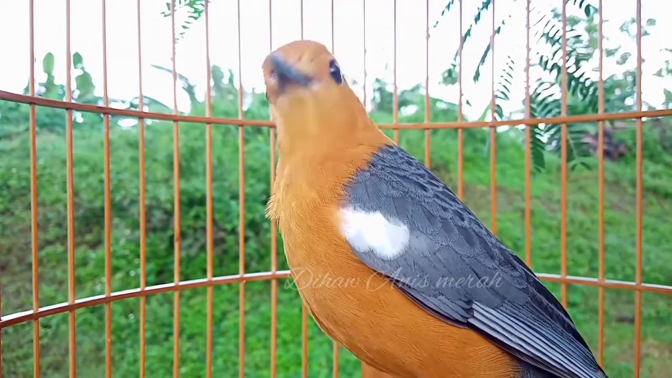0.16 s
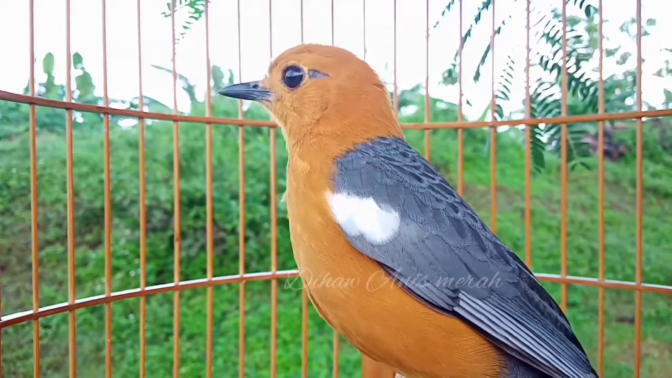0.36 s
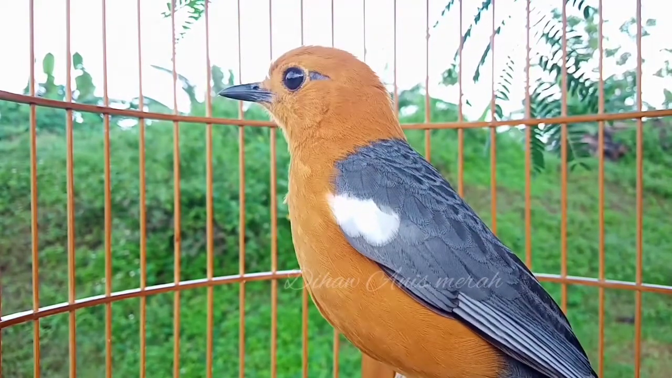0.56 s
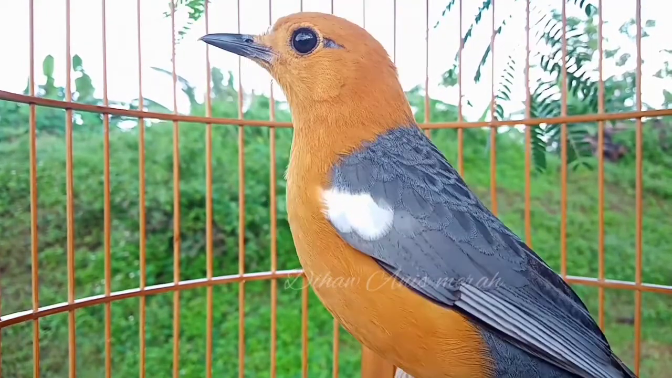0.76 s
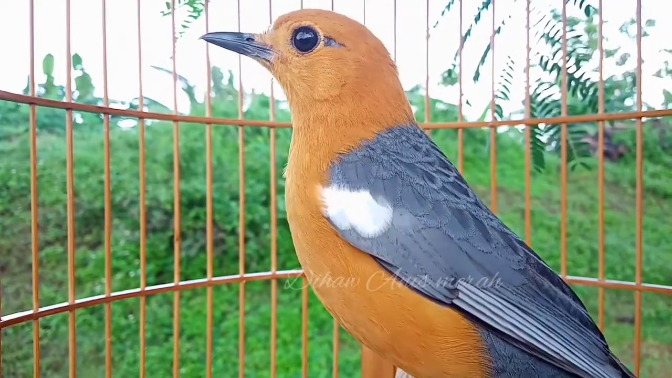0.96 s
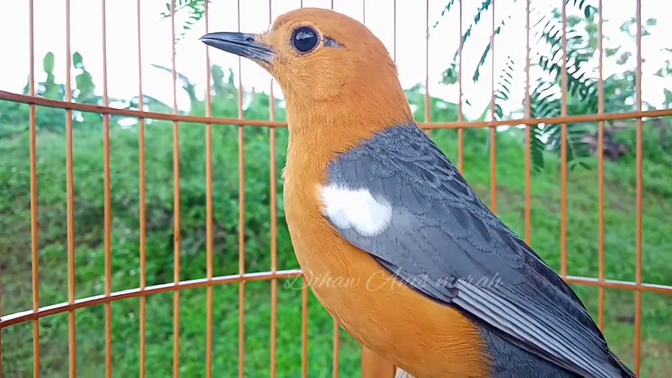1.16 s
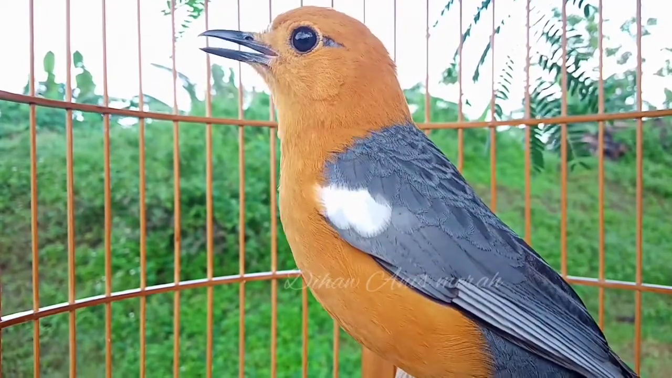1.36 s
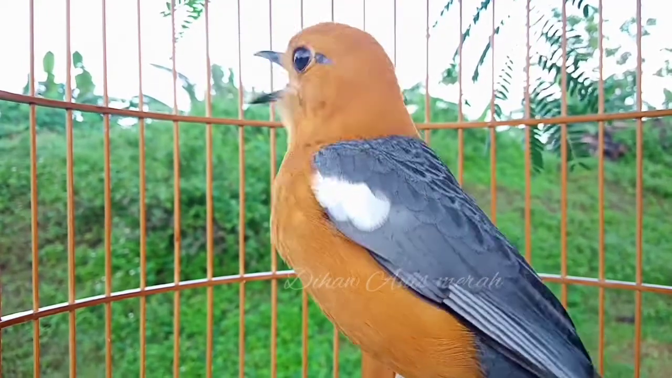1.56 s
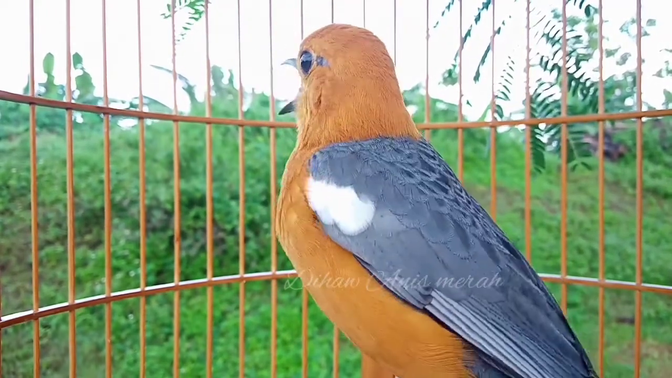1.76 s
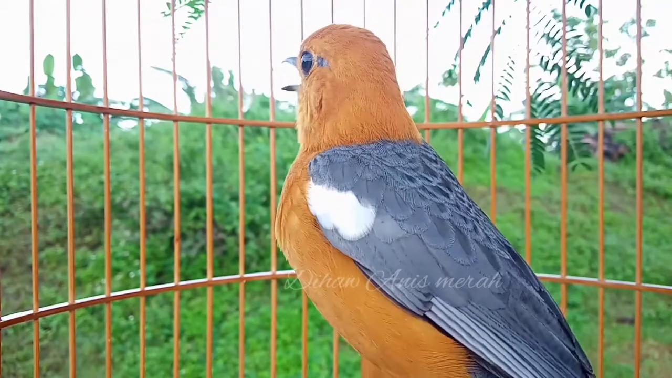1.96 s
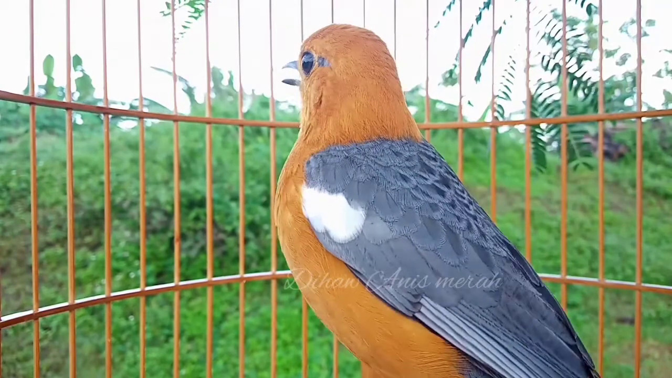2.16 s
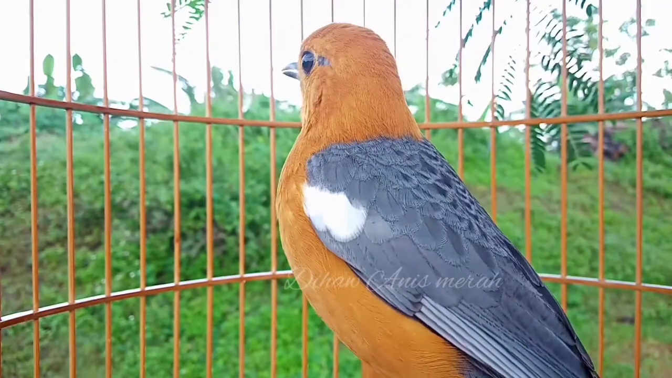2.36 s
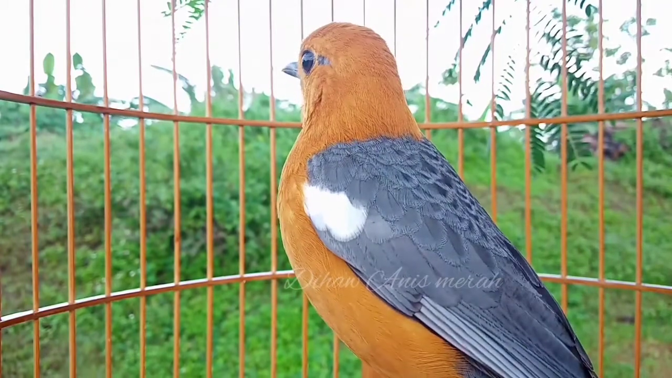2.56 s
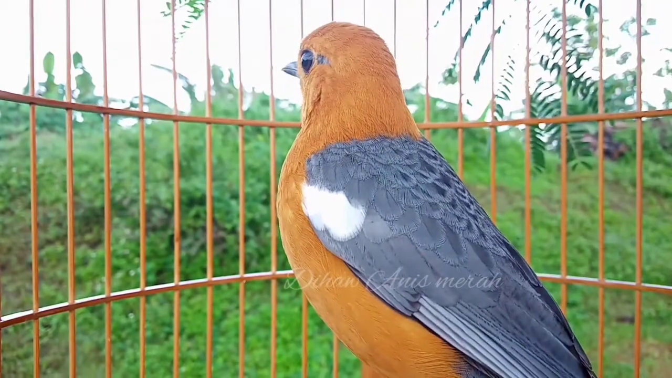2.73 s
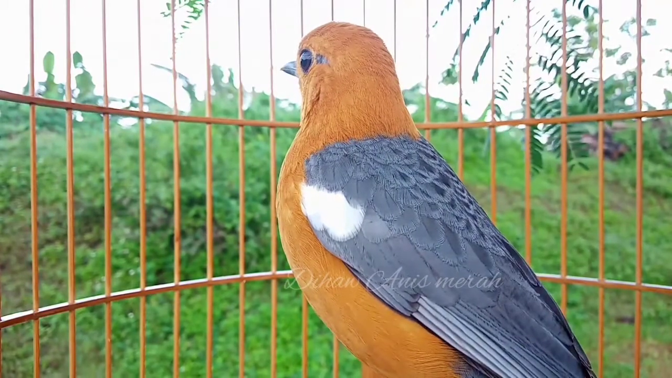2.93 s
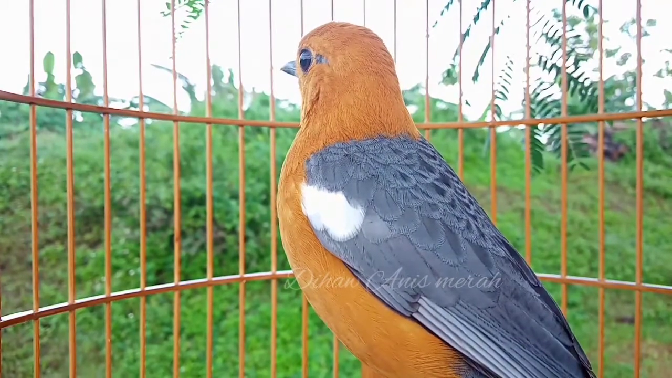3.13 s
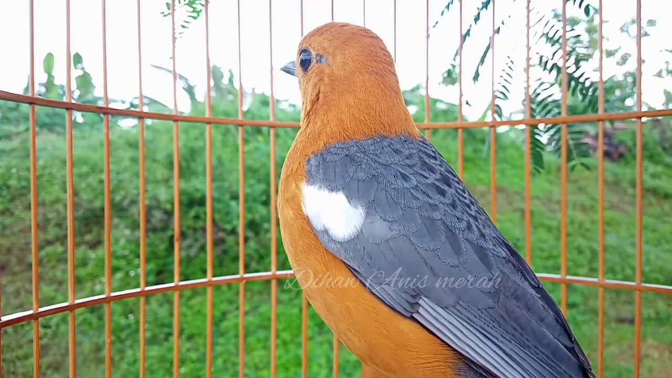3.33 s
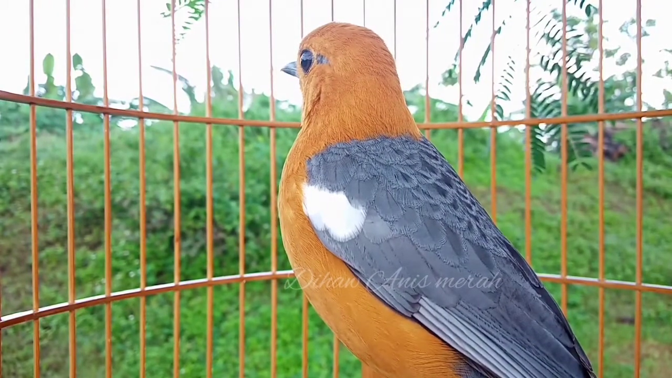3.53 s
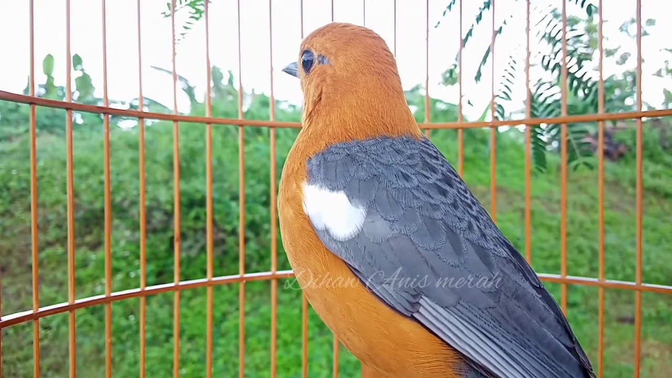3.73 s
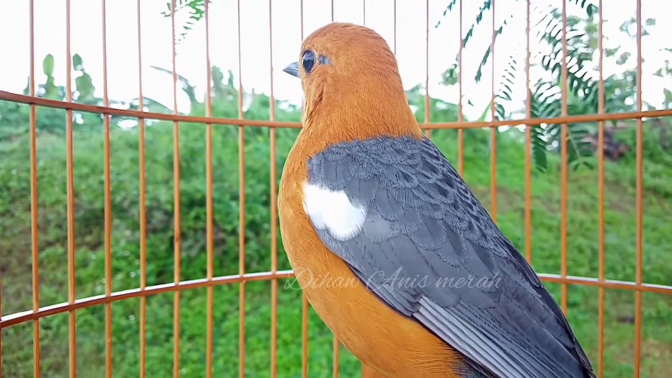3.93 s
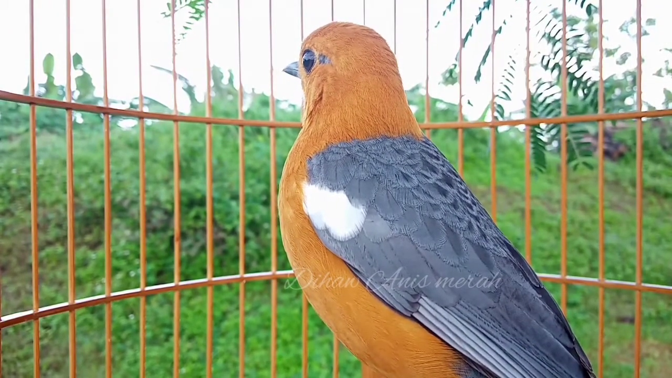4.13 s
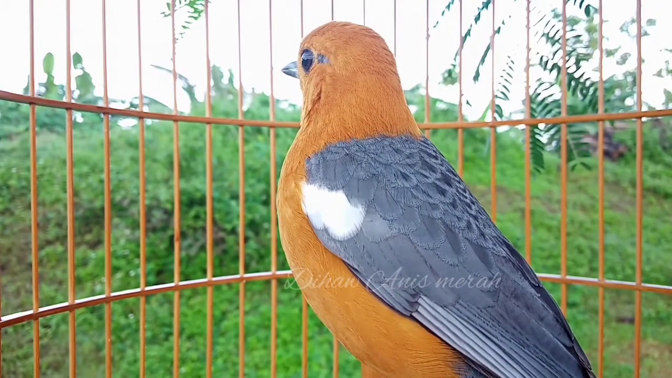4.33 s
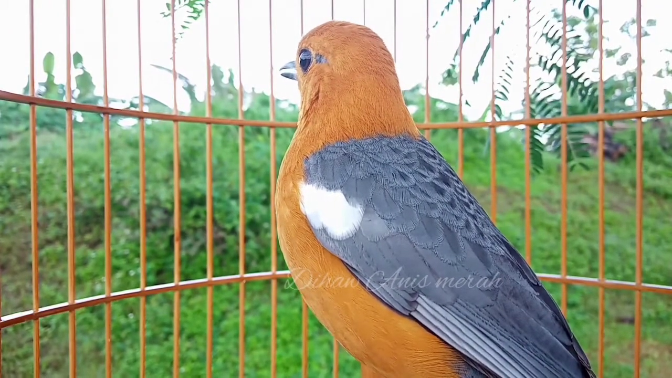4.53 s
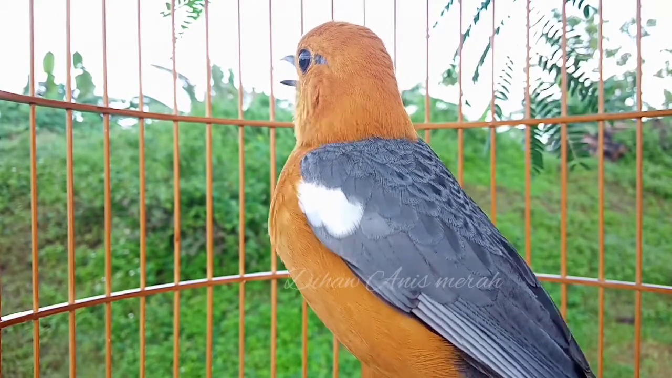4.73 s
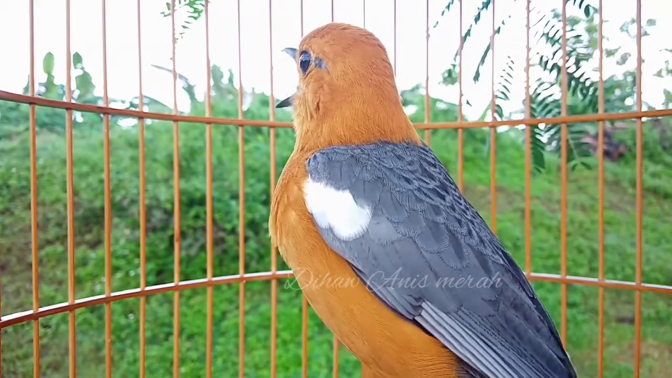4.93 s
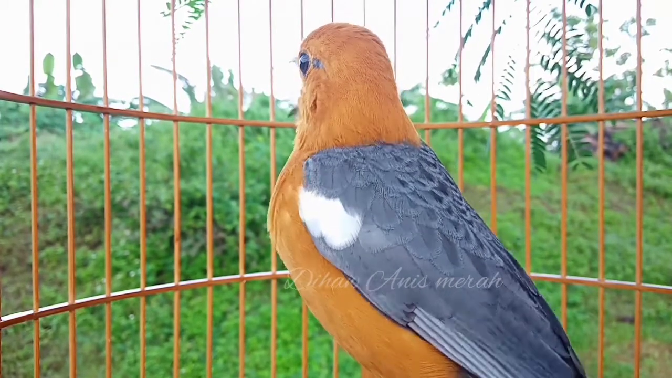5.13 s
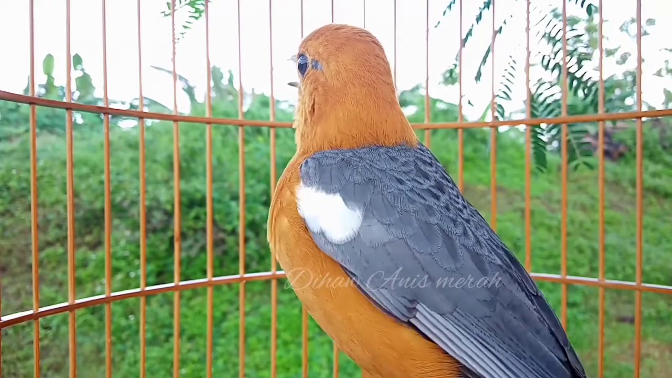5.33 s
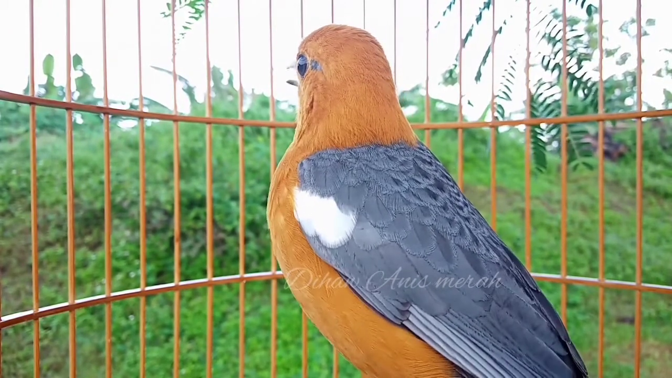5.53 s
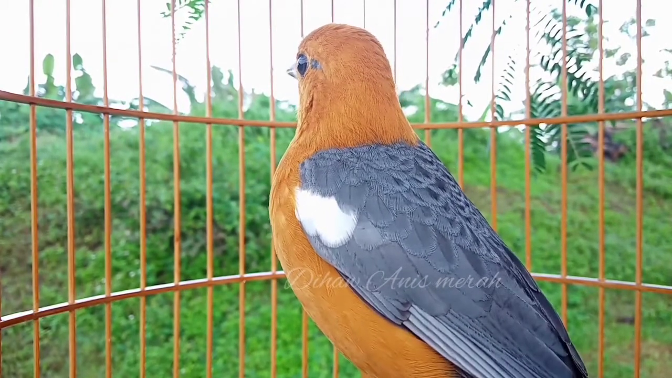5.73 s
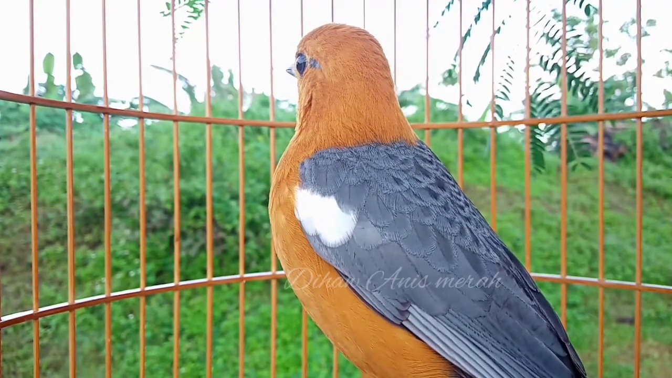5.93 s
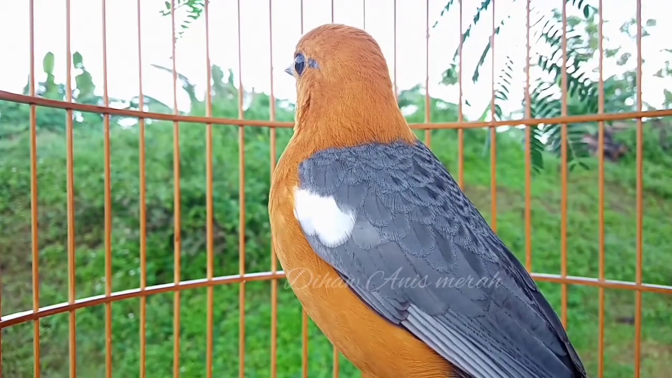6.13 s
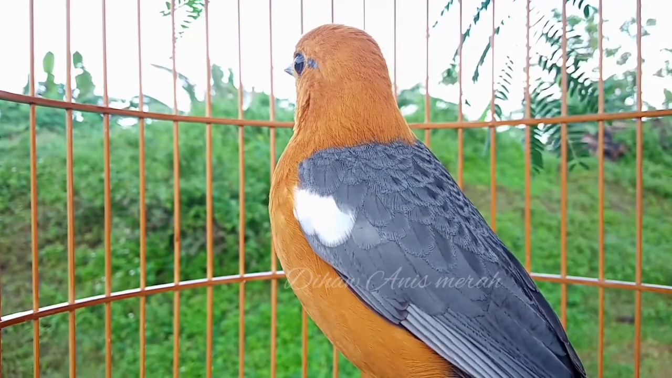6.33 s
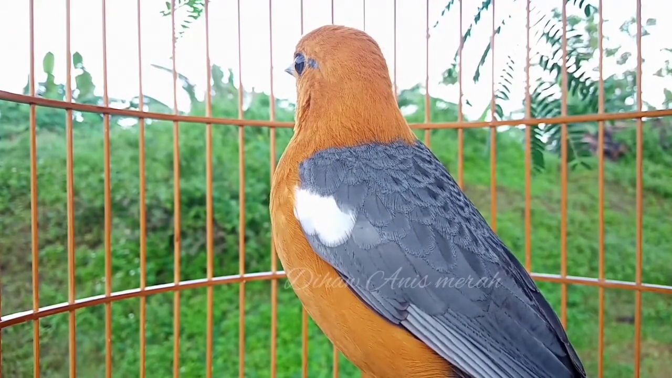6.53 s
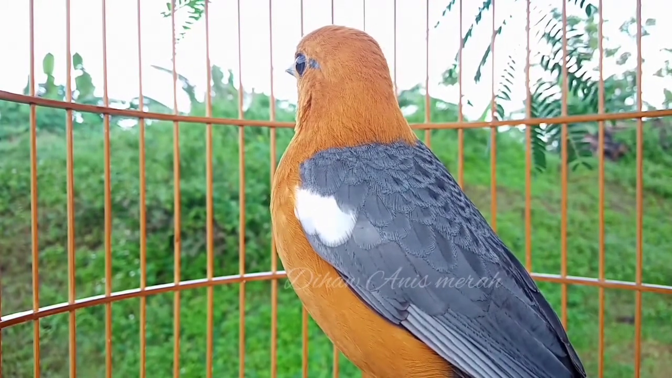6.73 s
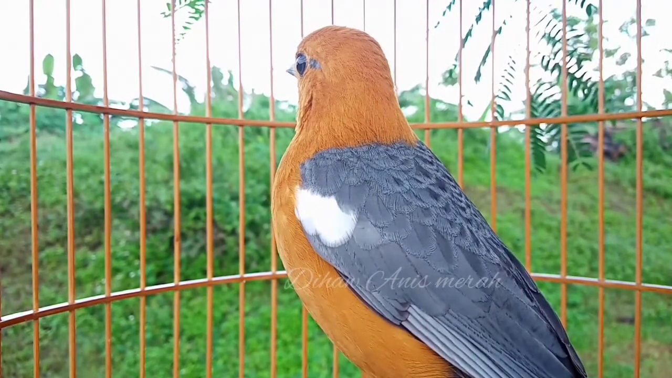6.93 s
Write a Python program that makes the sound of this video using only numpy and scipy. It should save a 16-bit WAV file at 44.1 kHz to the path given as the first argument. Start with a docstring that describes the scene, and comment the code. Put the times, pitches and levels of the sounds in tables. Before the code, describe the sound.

The setting is a quiet garden, with faint fading bird echoes at the start and a few far bird and fowl calls through the first second and a half. Soft, high insects chirp, trill and hiss throughout, above a low rumble of distant traffic that eases slightly. At about 1.4 seconds a caged thrush close to the microphone whistles three loud, clear notes: a long rise, a short high note and a fall, ending at 2 seconds. The notes have slightly scratchy edges and leave a faint outdoor echo. Far birds whistle softly in the pause. From 4.7 to 5.4 seconds the thrush sings a second phrase of three, again a rising sweep, a brief higher note and a lower falling one, with the same light echo. Insects and scattered distant whistles carry on until the end at about 7 seconds.

```python
"""A garden opens on the fading echoes of an earlier thrush phrase, then far birds and fowl, over distant
traffic and four kinds of insect that chirp, sweep, trill and hiss with their wings. At 1.4 s the caged
thrush close by whistles three notes on its vibrating membranes: a long rise, a short high note, a fall.
The valley rings faintly after it. At 4.7 s it sings a second phrase of three, and the valley rings again.
Insects and far birds play on to the end, the traffic easing."""
import sys
import numpy as np
from scipy import signal
from scipy.fft import rfft, irfft
from scipy.io import wavfile
from scipy.ndimage import uniform_filter1d

SR = 44100
rng = np.random.default_rng(int(sys.argv[2]) if len(sys.argv) > 2 else 0)


def to_wav(sig):
    """Store sig (one row per channel, or 1-D mono) as 16-bit WAV at the path in sys.argv[1].

    Samples outside -1..1 are clipped; the rate is SR.
    """
    pcm = np.clip(np.atleast_2d(sig), -1, 1) * 32767
    pcm = np.round(pcm).astype(np.int16)
    wavfile.write(sys.argv[1], SR, pcm.T)  # frames by channels


N = 312669

FULL_VOICE_DB, UPPER_FOLLOW = -12.5, .67   # partials from the 3rd up follow only part of the dynamics
TOP_PARTIAL_HZ, TOP_FADE_HZ = 17000, 1000   # partials fade out as they near the top
# Voicing across the range: (pitch [Hz], fundamental [dB], 2nd [dB], 3rd [dB], higher partials [dB])
TIMBRE_BY_PITCH = [(1570, -32, -1, -36, -37), (1896, -0.5, -6, -34, -27.5), (2091, 1, -34, -42.5, -34),
                   (2352, 0.5, -32.5, -35, -35.5), (2790, 0.5, -37.5, -31, -35.5), (2909, 0, -28, -34, -45),
                   (3050, 1, -51, -41, -49), (3170, 0.5, -45.5, -32.5, -50.5), (3564, 0, -33.5, -45.5, -43),
                   (3684, -0.5, -25, -51.5, -45.5), (3860, 1, -44, -42.5, -41.5),
                   (3950, 1.5, -46, -36.5, -39), (3962, 3, -25.5, -31.5, -52.5),
                   (4150, -1, -24.5, -34, -59)]
# Balance of partials 4 to 7: (trim [dB])
HIGHER_TRIMS = [-6, -2, -7.5, -12]
# EQ of beak and head on partials 4 to 7: (frequency [Hz], gain [dB])
BEAK_EQ = [(8000, -10.5), (9500, -6.5), (11000, -4.5), (12000, -4), (13500, 4), (14500, 2), (15800, -3)]


def whistle(hz, level_db, brightness):
    """One note from unsteady membranes: a breathy near sine whose octave takes over at the lowest pitch."""
    count = len(hz)
    sung_hz, *voicing = np.transpose(TIMBRE_BY_PITCH)
    first_db, second_db, third_db, higher_db = [
        np.interp(hz, sung_hz, db) + trim for db, trim in zip(voicing, [0, *brightness])]
    fundamental_db = level_db + first_db
    upper_db = FULL_VOICE_DB + UPPER_FOLLOW * (level_db - FULL_VOICE_DB)
    phase = running_phase(hz * (1 + .0004 * drift(380, count)))
    partials_db = [fundamental_db + .15 * drift(280, count),
                   level_db + second_db + 3 * drift(40, count),
                   upper_db + third_db + 3 * drift(40, count)]
    for number, trim_db in enumerate(HIGHER_TRIMS, start=4):
        beak_db = np.interp(number * hz, *np.transpose(BEAK_EQ))
        partials_db.append(upper_db + higher_db + trim_db + beak_db + 4.5 * drift(40, count))
    tone = np.zeros(count)
    for number, db in enumerate(partials_db, start=1):
        fray = 1 + amp(-14) * drift(700, count) * (number >= 3)   # a noisy fringe on the upper partials
        top_fade = np.clip((TOP_PARTIAL_HZ - number * hz) / TOP_FADE_HZ, 0, 1)
        tone += amp(db) * fray * top_fade * np.sin(number * phase)
    breath = filtered_noise(count, order=4, hz=6000, kind="high")   # turbulent air past the membranes
    breath_db = fundamental_db - 59.5 + 3.8 * drift(50, count)
    return tone + amp(breath_db) * breath


ATTACK_S, RELEASE_S, SILENT_DB = .003, .004, -69.5
# Pitch and level curves, one list of breakpoints a note: (time [s], pitch [Hz], level [dB])
SONG_NOTES = [
    [(1.387, 1580, -46.5), (1.39, 1910, -35), (1.397, 2082, -18.5), (1.413, 2156, -14),
     (1.432, 2165, -10.5), (1.441, 2260, -12.5), (1.447, 2340, -10), (1.452, 2485, -13), (1.463, 2546, -10),
     (1.471, 2629, -12), (1.492, 2708, -8.5), (1.498, 2757, -9), (1.523, 2868, -9), (1.537, 2940, -6),
     (1.576, 3052, -4.5), (1.589, 3092, -5.5), (1.596, 3147, -9), (1.6, 3247, -10.5), (1.603, 3046, -10),
     (1.608, 3029, -24.5)],
    [(1.711, 3380, -24), (1.717, 3730, -9.5), (1.72, 3677, -11.5), (1.727, 3713, -6.5), (1.734, 3625, -5.5),
     (1.741, 3580, -7.5), (1.748, 3560, -6), (1.755, 3554, -8), (1.766, 3522, -5.5), (1.775, 3594, -12.5),
     (1.782, 3270, -11.5), (1.785, 3270, -24)],
    [(1.86, 3020, -21), (1.865, 3210, -11), (1.872, 3214, -8.5), (1.88, 3184, -7.5), (1.901, 3018, -5),
     (1.906, 2960, -7.5), (1.908, 2670, -21.5), (1.912, 2570, -14.5), (1.921, 2750, -13.5),
     (1.93, 2696, -14), (1.935, 2636, -11.5), (1.945, 2337, -18), (1.956, 2340, -13), (1.973, 2128, -19.5),
     (1.984, 2178, -17.5), (1.995, 2141, -17.5), (2.002, 2090, -21), (2.006, 2090, -23.5),
     (2.012, 2064, -25.5), (2.018, 1580, -39), (2.021, 1530, -23)],
    [(4.71, 1603, -47.5), (4.716, 2030, -25.5), (4.72, 2182, -18), (4.734, 2143, -12), (4.742, 2123, -12),
     (4.749, 2253, -12), (4.758, 2253, -12.5), (4.762, 2332, -13), (4.775, 2355, -14.5),
     (4.779, 2440, -12.5), (4.788, 2584, -11.5), (4.794, 2533, -13), (4.8, 2535, -7.5),
     (4.808, 2655, -10.5), (4.818, 2707, -9), (4.831, 2814, -12), (4.842, 2873, -13), (4.855, 2943, -7.5),
     (4.862, 2934, -10.5), (4.869, 3053, -4), (4.892, 3181, -7.5), (4.918, 3192, -7.5), (4.93, 3320, -11.5),
     (4.934, 3064, -15.5), (4.938, 3083, -12), (4.941, 2980, -17)],
    [(5.029, 3705, -27), (5.031, 3940, -21.5), (5.035, 4185, -18.5), (5.05, 4014, -14.5),
     (5.074, 3887, -9.5), (5.08, 3874, -5.5), (5.084, 3996, -13.5), (5.092, 4022, -13), (5.098, 3880, -17),
     (5.1, 3565, -11.5), (5.102, 3710, -25.5)],
    [(5.271, 2316, -30.5), (5.276, 2624, -19.5), (5.282, 2457, -17.5), (5.29, 2470, -15.5),
     (5.3, 2344, -16), (5.325, 2227, -12), (5.341, 2195, -12), (5.351, 2265, -10), (5.358, 2230, -15),
     (5.361, 1835, -30), (5.365, 1528, -27), (5.368, 1506, -29)],
]
# Brightness trims, one row a note: (2nd partial [dB], 3rd partial [dB], higher partials [dB])
NOTE_BRIGHTNESS = [(-3.5, -1, -2.1), (0.3, 2.3, 3), (3, 0.2, 0.5), (0, -1, 2.6), (1.8, 2.5, -0.8),
                   (5, 4.5, -0.5)]


def thrush():
    """The lead voice: six gliding whistles, each springing from silence and falling back to it."""
    out = np.zeros(N)
    for note, brightness in zip(SONG_NOTES, NOTE_BRIGHTNESS):
        start = (note[0][0] - ATTACK_S, note[0][1], SILENT_DB)
        stop = (note[-1][0] + RELEASE_S, note[-1][1], SILENT_DB)
        hz, level_db = uniform_filter1d(curves([start, *note, stop]), size=60, mode="nearest")
        add(out, start[0], whistle(hz, level_db, brightness))
    return out


# Grit on the notes: (time [s], length [s], centre [Hz], width [Hz], level [dB])
GRIT_PUFFS = [(1.368, 0.013, 2300, 1200, -56.5), (1.376, 0.022, 2660, 1608, -44),
              (1.705, 0.043, 4821, 2000, -49.5), (1.857, 0.02004, 4294, 1197, -58),
              (2.013, 0.015, 2750, 1800, -42.5), (4.692, 0.012, 2800, 2000, -55.5),
              (4.696, 0.036, 2730, 1798, -42.5), (5.06, 0.057, 8980, 12900, -49),
              (5.095, 0.02, 3300, 1200, -41), (5.253, 0.017, 3000, 1800, -49.5),
              (5.267, 0.0083, 3000, 2500, -43.5), (5.352, .014, 12000, 5000, -59),
              (5.358, 0.022, 3200, 2190, -45)]


def note_grit():
    """Scratchy puffs at the note edges, and one brief wide hiss over the second phrase's high note."""
    out = np.zeros(N)
    for s, length, hz, width, db in GRIT_PUFFS:
        count = round(length * SR)
        grit = filtered_noise(count, order=3, hz=[hz - width / 2, hz + width / 2], kind="band")
        add(out, s, amp(db) * np.hanning(count) * unit_rms(grit))
    return out


EARLY_T60_S, VALLEY_T60_S, SLOPE_DELAY_S, SLOPE_SMEAR_S = .15, .83, .41, .04
# EQ of leaves and walls on the reverb: (frequency [Hz], gain [dB])
ECHO_EQ = [(1900, -6), (2300, -1.5), (2700, 1), (3100, -1.5), (3600, 0.5), (4000, 2.5), (8000, -3),
           (16000, -10)]


def valley_echoes(send):
    """Early reflections off cage, eaves and ground, the valley's tail and a smeared slap off a far slope."""
    t = np.arange(SR) / SR
    early = amp(-33 - 60 * t / EARLY_T60_S) * (t > .003)
    tail = amp(-39 - 60 * t / VALLEY_T60_S) * np.minimum(t / .033, 1)
    slap = amp(-62) * np.exp(-((t - SLOPE_DELAY_S) / SLOPE_SMEAR_S) ** 2)
    response = (early + tail + slap) * rng.standard_normal(SR) / np.sqrt(SR / 20)
    colour = amp(np.interp(np.fft.rfftfreq(2 * N, 1 / SR), *np.transpose(ECHO_EQ)))
    wet = irfft(rfft(send, 2 * N) * rfft(response, 2 * N) * colour)[:N]
    leaf_flutter = 1 + .2 * drift(70, N)   # moving leaves stir the echoes
    return wet * leaf_flutter


CHIRP_PERIOD_S = .0646
# Shape of one chirp: (time into the chirp [s], pitch [Hz], level [dB])
CHIRP_SHAPE = [(0, 7010, -76), (.003, 7015, -62), (.009, 7020, -55), (.02, 6990, -55), (.027, 6920, -60),
               (.031, 6860, -66), (.034, 6880, -62), (.038, 6900, -75), (.043, 6900, -71),
               (.048, 6900, -90)]
# Cues for the trains of chirps: (first chirp [s], last chirp [s])
CHIRP_TRAINS = [(.015, .28), (.537, .67), (1.408, 1.67), (1.928, 2.25), (2.443, 2.70), (2.962, 3.29),
                (3.605, 3.93), (4.253, 4.52), (4.837, 4.97), (5.355, 5.49), (5.742, 6.0), (6.259, 6.52),
                (6.842, 7.04)]


def cricket():
    """A near cricket repeats one pure chirp that sags in pitch as the wing slows."""
    out = np.zeros(N)
    hz, db = curves(CHIRP_SHAPE)
    for first, last in CHIRP_TRAINS:
        for k in range(round((last - first) / CHIRP_PERIOD_S) + 1):
            s = first + k * CHIRP_PERIOD_S + rng.normal(0, .0008)
            add(out, s, amp(db + rng.normal(0, .6)) * np.sin(running_phase(hz)))
    return out


def wing_stroke(length_s, from_hz, to_hz):
    """One scrape of a wing: a gliding tone, roughened by uneven teeth."""
    count = round(length_s * SR)
    teeth = 1 + .4 * drift(350, count)
    envelope = np.hanning(count) ** .49
    return envelope * teeth * np.sin(running_phase(np.linspace(from_hz, to_hz, count)))


STROKE_PERIOD_S, SWELL_DB_PER_STROKE = .0315, 1
CHATTER_PER_S, CHATTER_FLOOR_DB, CHATTER_RANGE_DB = 18, -80, 6
# Cues for the groups of strokes: (first stroke [s], last stroke [s], level of the last [dB])
SWEEP_GROUPS = [(.026, .115, -63.5), (.222, .289, -66), (.46, .524, -65), (.6, .6, -67), (.693, .693, -68),
                (.769, .831, -69), (1.016, 1.048, -71), (1.233, 1.295, -69), (2.121, 2.153, -65),
                (2.321, 2.415, -66), (2.552, 2.616, -67.5), (2.78, 2.844, -66), (3.01, 3.073, -67),
                (3.24, 3.303, -66.5), (3.405, 3.435, -72), (3.472, 3.562, -66), (3.642, 3.672, -71),
                (3.702, 3.765, -67), (3.802, 3.9, -68), (3.932, 3.996, -67.5), (4.05, 4.113, -66.5),
                (4.161, 4.227, -67), (4.267, 4.329, -65.5), (4.481, 4.543, -71), (5.192, 5.226, -65),
                (5.481, 5.546, -65), (5.592, 5.622, -71), (5.708, 5.771, -65.5), (5.809, 5.839, -75.5),
                (5.993, 6.056, -71), (6.241, 6.302, -70), (6.458, 6.521, -70.5), (6.565, 6.63, -68),
                (6.678, 6.737, -69.5), (6.799, 6.863, -67.5), (6.907, 6.939, -77), (7.032, 7.063, -68.5)]


def sweeping_insects():
    """Falling wing strokes in small swelling groups, over the chatter of the same insects farther off."""
    out = np.zeros(N)
    strokes = []
    for first, last, last_db in SWEEP_GROUPS:
        for s in np.linspace(first, last, round((last - first) / STROKE_PERIOD_S) + 1):
            swell_db = SWELL_DB_PER_STROKE * (s - last) / STROKE_PERIOD_S
            strokes.append((s, last_db + swell_db + rng.normal(0, 1.2)))
    for when, strength in rng.random((round(CHATTER_PER_S * N / SR), 2)):
        strokes.append((when * N / SR, CHATTER_FLOOR_DB + CHATTER_RANGE_DB * strength))
    for s, db in strokes:
        add(out, s, amp(db) * wing_stroke(length_s=.022, from_hz=5300, to_hz=4130))
    return out


TRILL_CYCLES_PER_S = 27.7
# The two strokes of a trill cycle: (time into the cycle [s], length [s], level [dB])
TRILL_STROKES = [(.0, .011, -67.5), (0.016, .015, -68.5)]


def trilling_insect():
    """An unbroken trill of paired, rising wing strokes."""
    out = np.zeros(N)
    for cycle in np.arange(.00038, N / SR, 1 / TRILL_CYCLES_PER_S):
        for s, length, db in TRILL_STROKES:
            stroke = wing_stroke(length, from_hz=5800, to_hz=6650)
            add(out, cycle + s + rng.normal(0, .001), amp(db + rng.normal(0, .51)) * stroke)
    return out


def leaf_blur(strokes, wet_db, t60_s=.1):
    """Leaves scatter the sound, softening each stroke with a short cloud of echoes."""
    t = np.arange(SR // 8) / SR
    cloud = amp(-60 * t / t60_s) * rng.standard_normal(len(t))
    return strokes + amp(wet_db) * signal.fftconvolve(strokes, cloud / np.linalg.norm(cloud))[:N]


def katydids(centre_hz=9902, width_hz=960, wingbeat_hz=108.5, level_db=-67):
    """A chorus heard as a bell-shaped band of hiss that throbs with the wing beat."""
    hiss = coloured_noise(lambda hz: np.exp(-((hz - centre_hz) / width_hz) ** 2))
    throb = 1 + .21 * np.sin(running_phase(wingbeat_hz * (1 + .0087 * drift(7.5, N))))
    return amp(level_db) * hiss * throb


# Cues for the fading echoes of an earlier thrush phrase, then far birds and fowl:
# (time [s], length [s], start pitch [Hz], middle pitch [Hz], end pitch [Hz], level [dB])
FAR_WHISTLE_CUES = [(0.001, 0.048, 3850, 3910, 4200, -56.5), (0.045, 0.077, 3920, 3960, 3990, -68.5),
                    (0.013, 0.082, 2540, 2470, 2470, -62), (0.131, 0.0756, 2470, 2310, 2320, -63.5),
                    (0.2, 0.14, 3850, 4200, 3770, -72), (0.264, 0.11, 2290, 2260, 2300, -67.5),
                    (0.83, 0.043, 1780, 1780, 1790, -70), (0.167, 0.18, 679, 730, 760, -76.5),
                    (0.439, 0.27, 760, 723, 690, -72.5), (0.778, .13, 1210, 1320, 1340, -71),
                    (0.811, 0.13, 3570, 4090, 4420, -66.5), (1.083, 0.41, 1086, 1116, 1110, -75.5),
                    (2.923, .11, 3200, 3870, 4150, -63.5), (3.399, 0.1205, 2950, 3180, 3120, -68),
                    (3.49, 0.076, 3450, 3926, 4490, -65.5), (3.62, .11, 3090, 3150, 3600, -76),
                    (4.271, 0.071, 2653, 2920, 3003, -73), (4.339, 0.097, 3465, 3800, 4150, -67.5),
                    (5.459, 0.054, 3300, 3297, 3156, -69), (5.722, 0.063, 3200, 3240, 3160, -72),
                    (5.968, .1, 3490, 3810, 4196, -72), (5.981, 0.087, 2550, 2940, 2600, -73),
                    (6.62, 0.097, 3700, 3870, 3546, -70), (6.636, .075, 3440, 3380, 3035, -68),
                    (6.873, 0.072, 3400, 3324, 2907, -67), (6.98, .06, 1950, 2265, 2267, -71)]


def far_whistles(attack_s=.012, release_s=.02):
    """Wavering whistles on curved glides, quick to start, then sagging; only low voices have an octave."""
    out = np.zeros(N)
    for s, length, from_hz, middle_hz, to_hz, level_db in FAR_WHISTLE_CUES:
        t = np.arange(0, length, 1 / SR)
        hz = np.polyval(np.polyfit([0, length / 2, length], [from_hz, middle_hz, to_hz], 2), t)
        envelope_db = np.interp(t, [0, attack_s, length - release_s, length], [-18, 0, -3, -18])
        phase = running_phase(hz * (1 + .007 * drift(37, len(t))))
        octave = amp(-5) * np.sin(2 * phase) * (hz < 1000)
        waver_db = 3 * drift(77, len(t))
        add(out, s, amp(level_db + envelope_db + waver_db) * (np.sin(phase) + octave))
    return out


# Tone of the bed, from rumble to thin hiss: (frequency [Hz], relative level [dB])
BED_SPECTRUM = [(25, -35.5), (65, -10.5), (110, -1.5), (190, -6.5), (330, -11.5), (550, -20), (1000, -24.5),
                (2000, -28.5), (3500, -27), (4700, -30), (5500, -35.5), (7000, -26), (7700, -35.5),
                (8500, -39.5), (12000, -43), (13600, -43), (14000, -39), (14400, -42.5), (16000, -40.5)]


def traffic_and_air(level_db=-64, fade_db_per_s=-.27):
    """A smooth bed of rumble and still air that sinks as the traffic draws away."""
    hz, db = np.transpose(BED_SPECTRUM)
    from_middle_s = (np.arange(N) - N / 2) / SR
    bed = coloured_noise(lambda f: amp(np.interp(np.log(f), np.log(hz), db)))
    return amp(level_db + fade_db_per_s * from_middle_s) * bed


def amp(db):
    """Gain of a level in dB."""
    return 10 ** (np.asarray(db) / 20)


def unit_rms(x):
    """The signal scaled to unit power."""
    return x / np.sqrt(np.mean(x ** 2) + 1e-20)


def filtered_noise(count, order, hz, kind):
    """White noise through a low-, high- or band-pass filter."""
    return signal.sosfilt(signal.butter(order, hz, kind, fs=SR, output="sos"), rng.standard_normal(count))


def coloured_noise(gain):
    """Unit-power noise, shaped by a gain for each frequency."""
    hz = np.fft.rfftfreq(N, 1 / SR) + 1
    return unit_rms(irfft(rfft(rng.standard_normal(N)) * gain(hz), N))


def drift(hz, count):
    """A random modulator of unit power, moving at rates up to about hz."""
    return unit_rms(filtered_noise(count + 4000, order=4, hz=hz, kind="low")[4000:])


def add(track, s, sound):
    """Mixes a sound in from the given time on."""
    at = max(round(s * SR), 0)
    track[at:at + len(sound)] += sound[:max(N - at, 0)]


def curves(breakpoints):
    """Joins timed breakpoints into one sample-by-sample curve for each value column."""
    s, *columns = np.transpose(breakpoints)
    return [np.interp(np.arange(s[0], s[-1], 1 / SR), s, column) for column in columns]


def running_phase(hz):
    """Phase of a pitch curve, from a random start."""
    return 2 * np.pi * (np.cumsum(hz) / SR + rng.random())


def scene():
    """The mono mix: thrush up front, far whistles deep in the reverb, insects and traffic behind."""
    lead = thrush() + note_grit()
    far = far_whistles()
    wet = valley_echoes(lead + amp(30) * far)   # a much hotter send sets the far whistles back
    insects = cricket() + leaf_blur(sweeping_insects(), wet_db=-4.5)
    insects += leaf_blur(trilling_insect(), wet_db=-3) + katydids()
    return (lead + far + wet + insects + traffic_and_air())[None]


def record(dry, cutoff_hz=15850):
    """A steep low-pass takes the very top off the mix."""
    return signal.sosfilt(signal.ellip(10, .5, 60, cutoff_hz, fs=SR, output="sos"), dry)


dry = scene()
out = record(dry)
to_wav(out)
```